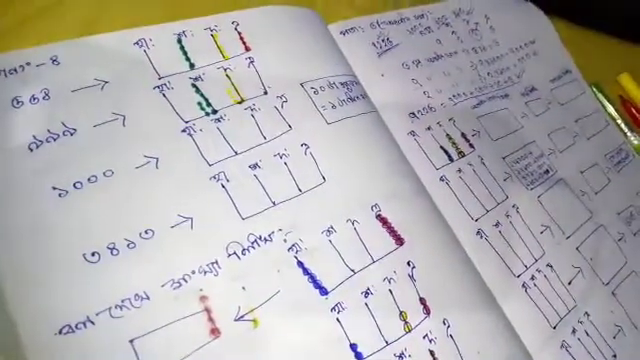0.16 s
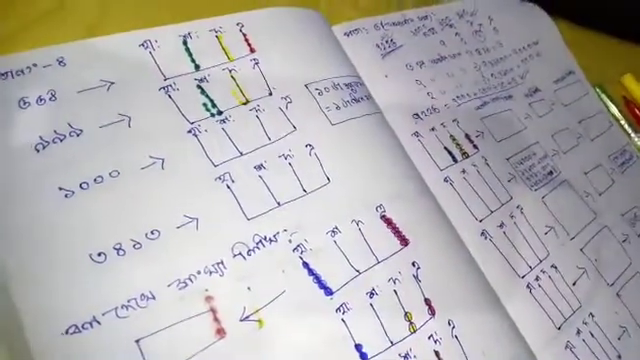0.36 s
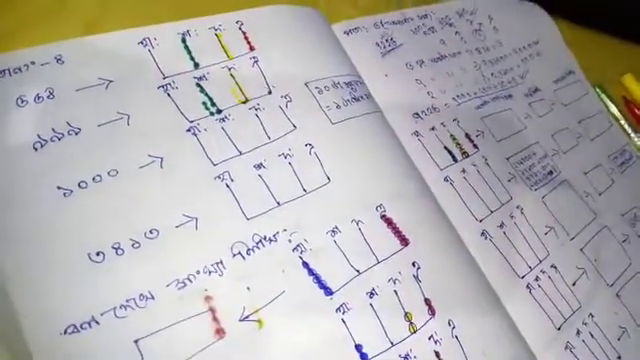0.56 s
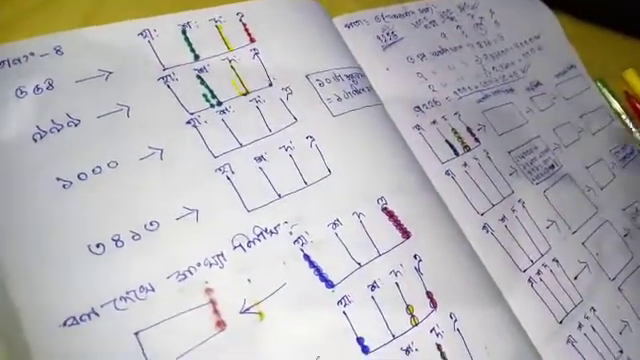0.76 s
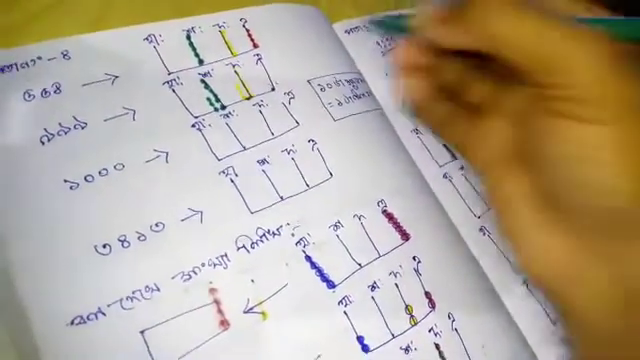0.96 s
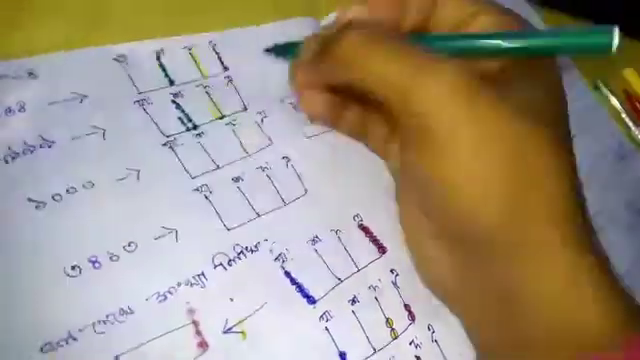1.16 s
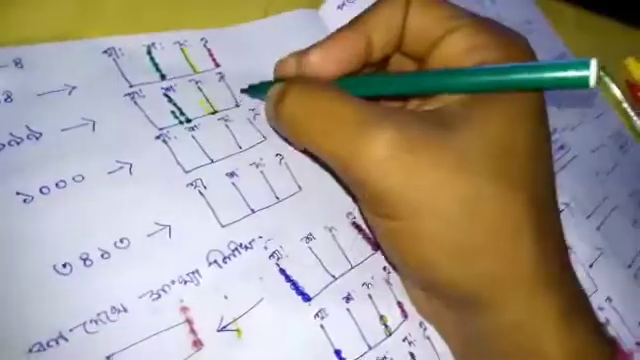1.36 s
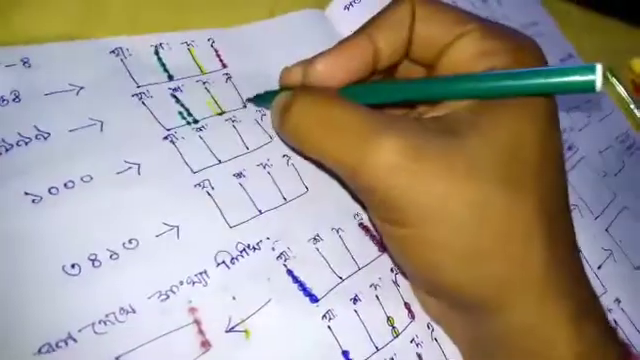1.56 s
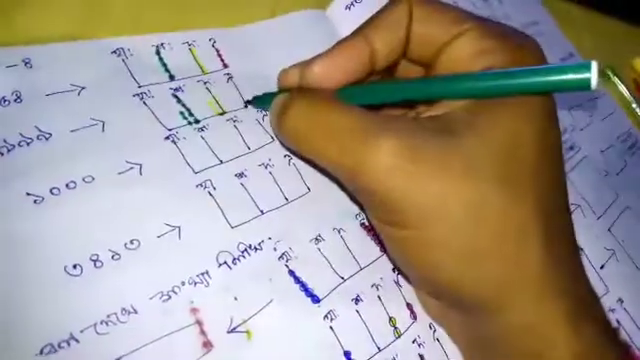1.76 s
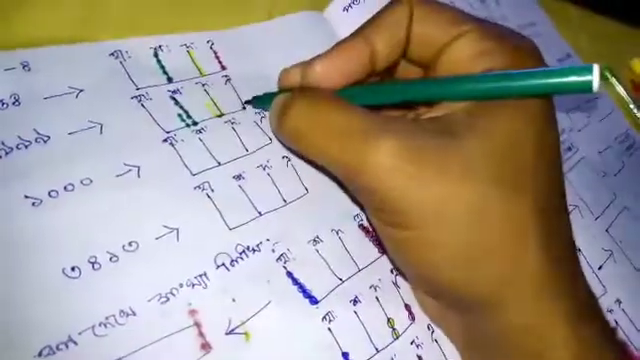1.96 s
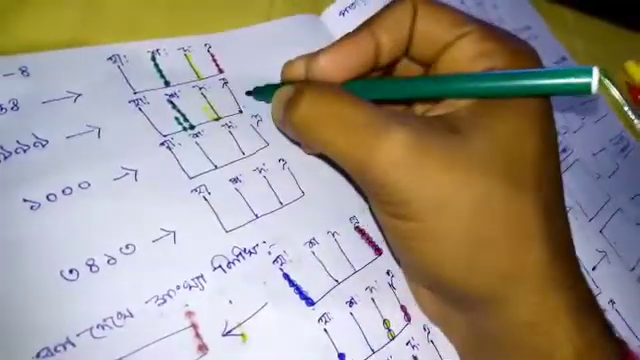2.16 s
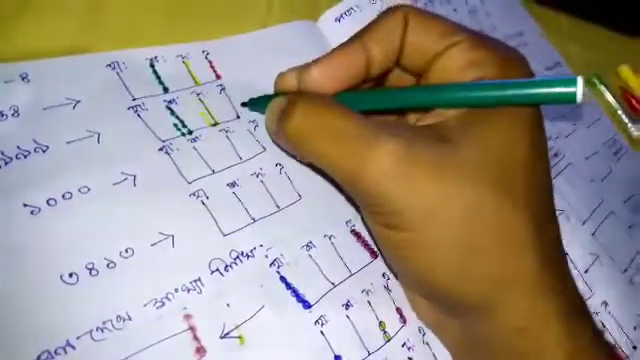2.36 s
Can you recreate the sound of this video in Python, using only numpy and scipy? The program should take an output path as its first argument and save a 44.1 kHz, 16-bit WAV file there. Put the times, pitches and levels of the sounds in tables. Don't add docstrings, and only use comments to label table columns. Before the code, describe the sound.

Plastic pen clatter on a desk, one sharp clack and quick bounces, then faint hand-on-paper rustle

```python
import sys
import numpy as np
from scipy import signal
from scipy.fft import rfft, irfft
from scipy.io import wavfile
from scipy.ndimage import uniform_filter1d, minimum_filter1d

SR = 44100
rng = np.random.default_rng(int(sys.argv[2]) if len(sys.argv) > 2 else 0)


def transcribe(u):
    v = np.clip(np.atleast_2d(u).T, -1, 1)
    q = np.round(v * 32767).astype(np.int16)
    wavfile.write(sys.argv[1], SR, q)


def to_linear_factor(level_db):
    exponent = np.asarray(level_db, float) / 20
    return 10 ** exponent


N = 105840

# (frequency [Hz], level [dB])
AIR_COLOUR = [(15, -49.5), (25, -17.5), (237, -7.5), (599, -16.5), (1820, -18), (5120, -29), (5840, -30.5),
              (6330, -33.5), (14000, -41.5)]
# (frequency [Hz], width [Hz], level [dB])
HUM_TONES = [(119.1, 12, -76), (200, 57, -71), (231, 62, -73), (315, 52, -74.5)]
# (frequency [Hz], time to fall by 60 dB [s])
ROOM_DECAY = [(700, 0.41), (1500, 0.14), (3500, 0.22), (6500, 0.18), (9500, 0.15), (12000, 0.14)]

WHISTLES = [(.001, 0.08, -74, 3400, 3360), (.041, 0.082, -81, 7460, 7350), (.466, 0.12, -71, 5760, 5784),
            (.735, 0.093, -79.5, 4780, 4540), (.842, 0.11, -75.5, 4320, 4155),
            (1.261, 0.034, -66.5, 880, 860), (1.291, 0.086, -61.5, 2073, 2010),
            (1.431, 0.089, -63.5, 2745, 2780), (1.755, 0.052, -81, 5370, 5470),
            (1.845, 0.22, -72, 5630, 5820), (2.142, 0.18, -70.5, 4620, 4590),
            (2.241, 0.039, -68, 5550, 5620), (2.272, 0.12, -72.5, 4390, 4350)]
HOARSE_CALLS = [(.44, 0.35, -72, 2490, 2500), (.47, 0.16, -66, 2890, 2890), (.612, 0.17, -66.5, 2950, 2970),
                (.72, 0.16, -71, 2326, 2330), (.77, 0.26, -66.5, 2750, 3060),
                (.88, 0.27, -65.5, 2390, 2240), (1.0, 0.2, -59, 2610, 2630),
                (1.01, 0.15, -64.5, 3060, 2940), (1.17, 0.18, -66, 2700, 2650),
                (1.26, 0.29, -64.5, 2140, 2100), (1.6, 0.38, -74.5, 1417, 1780),
                (1.8, .28, -72, 2010, 1790), (2.09, 0.14, -66.5, 2806, 3040), (2.25, .1, -66, 2730, 3000)]
BLURRED_CHIRPS = [(.003, .021, -71, 3050, 3040), (.031, .041, -69, 5910, 5610),
                  (.046, .085, -82, 9610, 9890), (.063, .046, -70, 6260, 6310),
                  (.101, .041, -70, 5860, 5710), (.136, .041, -73, 5010, 5410),
                  (.481, .045, -82, 9710, 9720), (.491, .11, -71.5, 3010, 3020),
                  (.616, .125, -68, 3030, 3060), (1.661, .09, -81, 5700, 5600),
                  (1.701, .05, -73, 1750, 1700), (1.871, .12, -82, 9610, 9710), (2.1, .06, -74, 5200, 4900),
                  (2.13, .08, -69, 3080, 3000), (2.245, .1, -73, 5850, 5650), (2.247, .04, -69, 3350, 3300),
                  (2.28, .12, -69, 4450, 4300)]

# (start [s], length [s], level [dB], centre [Hz], spread [octaves])
SLIDES = [(0.006, 0.21, -68.5, 5600, 0.29), (0.961, 0.22, -76, 6370, 0.1), (1.209, 0.11, -59.5, 5350, 1.6),
          (1.212, 0.097, -69.5, 5400, .12), (1.237, 0.19, -67, 3400, 1), (1.333, 0.18, -67.5, 7400, 0.97),
          (1.346, 0.14, -75, 5540, 0.054), (1.452, 0.2, -81, 12100, 0.17), (1.457, 0.095, -68, 4300, 0.33),
          (1.443, 0.062, -81, 7600, 0.97), (2.03, 0.058, -78.5, 7200, 0.21),
          (2.083, 0.12, -76.5, 4250, 0.33)]
# (start [s], time to fall by 60 dB [s], level [dB], centre [Hz], spread [octaves])
PAGE_RUSTLES = [
    (1.506, 0.29, -52, 3300, 0.65),
    (1.508, 0.29, -50, 1250, 0.54),
    (1.534, 0.17, -46, 1284, 0.19),
    (2.244, 0.45, -63, 3300, 0.51),
    (1.49, 0.48, -60.5, 700, 0.54),
    (1.52, 0.21, -55.5, 2370, 0.41),
]
# (start [s], length [s], level [dB], centre [Hz])
DESK_PUSHES = [(0.298, .1, -56.5, 200), (0.338, 0.064, -67.5, 69.4), (0.571, 0.083, -59, 230),
               (0.802, 0.071, -63.5, 250), (1.267, 0.077, -64, 75), (1.535, 0.068, -52, 200),
               (1.604, 0.053, -63.5, 90), (1.82, 0.064, -56, 236), (1.925, 0.047, -60, 238),
               (2.101, 0.089, -59.5, 224.4)]
# (time [s], peak level [dB])
SKIN_SLIPS = [(1.4395, -56), (1.449, -57), (1.4557, -50), (1.463, -53), (1.470, -49.5), (1.476, -59),
              (1.481, -61), (1.487, -59)]

TOUCH_RING = [(1866, 290, -8), (5960, 180, -1), (7200, 170, -15.5), (9200, 540, -15)]
SCATTER_RING = [(2330, 170, 7.5), (3240, 870, 9), (6960, 650, 0.5), (9470, 270, -17), (10620, 190, -28.5),
                (11800, 350, -21.5)]
CLACK_RING = [(2360, 430, 4), (3358, 480, 0.5), (4882, 420, -2), (6100, 240, -1.5), (9260, 980, -2.5),
              (10600, 180, -21), (12930, 940, -18)]
BOUNCE_RING = [(1320, 510, -4), (2380, 150, -5), (3340, 390, 0.5), (4610, 570, -0.5), (6340, 260, 3.5),
               (10500, 220, -28), (12900, 890, -24)]
SETTLE_RING = [(1820, 210, -3), (2790, 900, -4.5), (3710, 140, 2.5), (4760, 540, -9.5), (6000, 160, -7),
               (9650, 630, -14), (11700, 230, -40)]
NIB_RING = [(1660, 260, 0), (2360, 130, -6.5), (3070, 348, -5), (4100, 280, -11.5), (5000, 500, -19.5),
            (8000, 2900, -30.5)]
CAP_RING = [(1240, 195, -2), (3740, 320, -8.5)]
CLIP_RING = [(3730, 408, 3), (4453, 980, -21)]
CREAK_RING = [(4000, 480, -8), (6000, 420, 5), (7840, 340, -11), (9230, 370, 3), (10400, 370, -8)]

TOUCH_BLOWS = [
    (0.181, -40.5, -15),
]
SCATTER_BLOWS = [
    (0.2005, -26, -13.5),
    (0.2042, -33.5, -14),
    (0.2071, -29.5, -11.5),
]
CLACK_BLOWS = [
    (0.2154, -17, -7.5),
    (.216, -7.5, -18),
    (0.2175, -23.5, -8.5),
]
BOUNCE_BLOWS = [
    (0.3069, -18.5, -4.5),
]
SETTLE_BLOWS = [
    (0.2856, -33.5, -16),
    (0.3508, -26, -8.5),
    (0.3622, -48, -3),
]
NIB_BLOWS = [
    (0.174, -51, 9),
    (1.697, -56.5, -10.5),
    (1.7471, -42.5, -3.5),
    (1.7496, -35, -9),
]
CAP_BLOWS = [
    (0.3095, -31, -2.5),
    (0.325, -36, -17),
]
CLIP_BLOWS = [
    (0.2311, -31.5, -3),
    (0.3529, -36.5, -2.5),
]

# (frequency [Hz], level [dB])
SHIVER_COLOUR = [(180, -46.5), (300, -8.5), (858, -18), (1380, -8.5), (2970, -10.5), (4020, -2), (6920, -9),
                 (12100, -18), (13500, -23.5)]
# (time [s], level [dB], time to fall by 60 dB [s])
SHIVERS = [
    (.178, -59.5, 0.42),
    (0.202, -33.5, 0.082),
    (0.2178, -37, 0.4),
    (.307, -46, 0.13),
    (0.35, -55, 0.058),
]


def evened(x):
    return x / np.sqrt(np.mean(x ** 2) + 1e-20)


def read(points, hz):
    f, value = np.transpose(points)
    return np.interp(np.log(hz + 1), np.log(f + 1), value)


def add(mix, s, sound):
    part = mix[max(round(s * SR), 0):][:len(sound)]
    part += sound[:len(part)]


def resonate(x, hz, width):
    turn = np.exp(2j * np.pi * np.cumsum(hz * np.ones(len(x))) / SR)
    r = np.exp(-np.pi * width / SR)
    return 2 * (turn * signal.lfilter([1 - r], [1, -r], x / turn + 1e-18)).real


def resonate_twice(x, hz, width):
    return resonate(resonate(x, hz, width), hz, width)


def wander(count, per_s):
    size = max(round(SR / per_s), 1)
    return evened(uniform_filter1d(uniform_filter1d(rng.standard_normal(count), size), size))


def shaped(x, gain):
    return evened(irfft(rfft(x) * gain(np.fft.rfftfreq(len(x), 1 / SR)), len(x)))


def bump(hz, spread):
    return lambda f: np.exp(-(np.log2((f + 1) / hz) / spread) ** 2 / 2) / (1 + (f / 10740) ** 8)


def patchy(patch_db):
    a, b, patches = rng.standard_normal((N // 128 + 5, 257, 3)).T
    patches = uniform_filter1d(uniform_filter1d(patches, size=7, axis=0), size=14, axis=1)
    z = (a + 1j * b) * to_linear_factor(patch_db * evened(patches))
    return evened(signal.istft(z, nperseg=512, noverlap=384)[1][:N])


def echo(x):
    taps = np.zeros(SR // 2)
    at = np.arange(100, len(taps) - 12, 12)
    taps[at + rng.integers(0, 12, len(at))] = rng.standard_normal(len(at))
    hz, t, z = signal.stft(taps, SR, nperseg=128)
    t60 = np.maximum(read(ROOM_DECAY, hz), 0.03)[:, None]
    tail = signal.istft(z * to_linear_factor(-60 * t / t60), SR, nperseg=128)[1]
    return signal.fftconvolve(x, tail / np.linalg.norm(tail))


def room():
    air = shaped(patchy(2.3), lambda f: to_linear_factor(read(AIR_COLOUR, f)))
    noise = rng.standard_normal(N)
    hum = sum(to_linear_factor(db) * evened(resonate_twice(noise, hz, width)) for hz, width, db in HUM_TONES)
    return to_linear_factor(-68) * air + hum * to_linear_factor(1.0 * wander(N, 14))


def birds(notes, width, throb_db):
    out = np.zeros(N)
    for s, length, db, first_hz, last_hz in notes:
        u = np.arange(0, 1, 1 / (length * SR))[:SR // 2]
        hz = first_hz + (last_hz - first_hz) * u ** 0.71
        note = evened(resonate_twice(rng.standard_normal(len(u)), hz, width))
        throb = wander(SR // 2, 49.0)[:len(u)]
        swell = np.sin(np.pi * u ** 0.77) ** 0.49
        add(out, s, to_linear_factor(db + throb_db * throb) * swell * note)
    return out


def pushes():
    out = np.zeros(N)
    t = np.arange(SR // 4) / SR
    for s, length, db, hz in DESK_PUSHES:
        low = shaped(rng.standard_normal(len(t)), bump(hz, 0.28))
        add(out, s, to_linear_factor(db) * np.sin(np.pi * np.minimum(t / length, 1)) * low)
    return out


def hand():
    out = np.zeros(N)
    noise = patchy(1.5) * to_linear_factor(0.5 * wander(N, 460))
    for s, length, db, hz, spread in SLIDES:
        u = np.arange(0, 1, 1 / (length * SR))
        scrape = shaped(noise[(round(s * SR) + np.arange(len(u))) % N], bump(hz, spread))
        swell = np.minimum(u / 0.2, 1) * np.cos(np.pi / 2 * u ** 1.1)
        add(out, s, to_linear_factor(db) * swell * scrape)
    t = np.arange(SR // 4) / SR
    for k, (s, t60, db, hz, spread) in enumerate(PAGE_RUSTLES):
        scrape = shaped(noise[k * len(t):][:len(t)], bump(hz, spread))
        rise = np.minimum(t / 0.0026, 1)
        add(out, s, to_linear_factor(db - 60 * t / t60) * rise * scrape)
    return out


def blow(body, crack_db):
    t = np.arange(1500) / SR
    click = 1. * (t == 0)
    ring = np.zeros(len(t))
    for k, (hz, width, db) in enumerate(body):
        ring += (-1) ** k * to_linear_factor(db) * resonate_twice(click, hz, 1.68 * width)
    crack = np.diff(rng.standard_normal(len(t) + 1)) * np.exp(-t / 0.00084)
    crack = signal.lfilter(*signal.butter(4, 10600, fs=SR), crack)
    thud = np.sin(2 * np.pi * 327 * t) * np.exp(-t / 0.0029)
    return ring / abs(ring).max() + to_linear_factor(crack_db) * crack / abs(crack).max() + to_linear_factor(-32.5) * thud


def add_blow(mix, s, db, body, crack_db, echo_db):
    sound = to_linear_factor(db) * blow(body, crack_db)
    add(mix, s, sound)
    add(mix, s, to_linear_factor(echo_db) * echo(sound))


def creak():
    out = np.zeros(N)
    for s, db in SKIN_SLIPS:
        add_blow(out, s, db, CREAK_RING, -14, -8)
    return out


def shivers():
    out = np.zeros(N)
    t = np.arange(SR // 3) / SR
    for s, db, t60 in SHIVERS:
        grains = rng.standard_normal(len(t)) * to_linear_factor(1.2 * wander(len(t), 500))
        rattle = shaped(grains, lambda f: to_linear_factor(read(SHIVER_COLOUR, f)))
        rise = np.minimum(t / 0.00062, 1)
        add(out, s, to_linear_factor(db - 60 * t / t60) * rise * rattle)
    return out


def pens():
    out = np.zeros(N)
    kinds = [(TOUCH_RING, TOUCH_BLOWS, -14), (SCATTER_RING, SCATTER_BLOWS, -9),
             (CLACK_RING, CLACK_BLOWS, -10), (BOUNCE_RING, BOUNCE_BLOWS, -11),
             (SETTLE_RING, SETTLE_BLOWS, -8), (NIB_RING, NIB_BLOWS, -22),
             (CAP_RING, CAP_BLOWS, -30), (CLIP_RING, CLIP_BLOWS, -25)]
    for body, blows, crack_db in kinds:
        for s, db, echo_db in blows:
            add_blow(out, s, db, body, crack_db, echo_db)
    return out


def scene():
    mix = room()
    mix = mix + birds(WHISTLES, width=80, throb_db=1.57)
    mix = mix + birds(HOARSE_CALLS, width=306, throb_db=0.5)
    mix = mix + birds(BLURRED_CHIRPS, width=120, throb_db=2.9)
    mix = mix + pushes() + hand() + creak()
    mix = mix + shivers() + pens()
    return np.array([mix, mix])


def mismatch(x):
    hz, t, z = signal.stft(x, SR, nperseg=1024)
    a, b = rng.standard_normal((len(t), len(hz), 2)).T
    patches = rng.random((len(t) // 3 + 1, len(hz) // 20 + 1)).T
    patches = patches.repeat(20, axis=0).repeat(3, axis=1)[:len(hz), :len(t)]
    level = np.exp(uniform_filter1d(np.log(abs(z) + 1e-9), size=21, axis=0))
    chance = 0.8 * np.minimum(hz / 7000, 1)[:, None] ** 2
    on = (patches < chance) * (hz > 4300)[:, None]
    side = signal.istft(on * level * (a + 1j * b), SR, nperseg=1024)[1][:N]
    power = abs(uniform_filter1d(x ** 2, size=400)) / to_linear_factor(2 * -48)
    quiet = minimum_filter1d(1 / (1 + power ** 2), round(0.045 * SR))
    return side * uniform_filter1d(quiet, size=200)


def masked(x):
    hz, t, z = signal.stft(x, SR, nperseg=256)
    power = uniform_filter1d(uniform_filter1d(abs(z) ** 2, size=5, axis=0), size=3, axis=1)
    weak = power < to_linear_factor(2 * -27) * power.max(axis=0)
    loud = power.sum(axis=0) > to_linear_factor(2 * -54.5)
    treble = (hz > 10500)[:, None]
    return signal.istft(z * ~(weak & loud & treble), SR, nperseg=256)[1][:N]


def roll_off(x):
    return signal.sosfilt(signal.butter(12, 14420, fs=SR, output="sos"), x)


def record(dry):
    x = signal.lfilter(*signal.butter(2, 46.6, "high", fs=SR), dry)
    side = to_linear_factor(-2.5) * mismatch(x[0])
    both = masked(x[0]) + [side, -side]
    treble_limit = signal.firwin(255, 13300, window=("kaiser", 5), fs=SR)
    mix = signal.oaconvolve(both, treble_limit[None], "same")
    return roll_off(mix)


dry = scene()
out = record(dry)
transcribe(out)
```